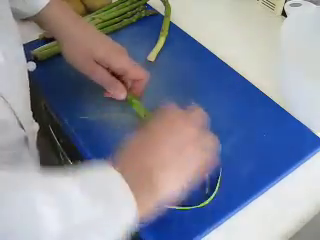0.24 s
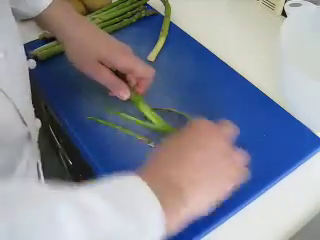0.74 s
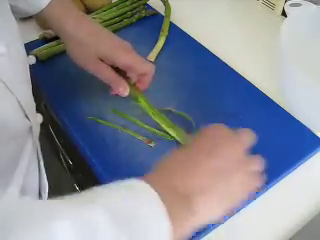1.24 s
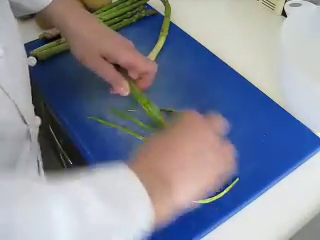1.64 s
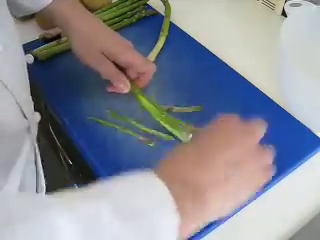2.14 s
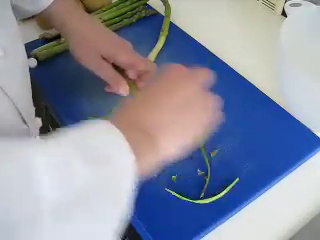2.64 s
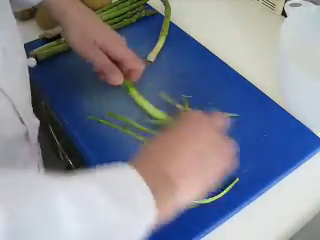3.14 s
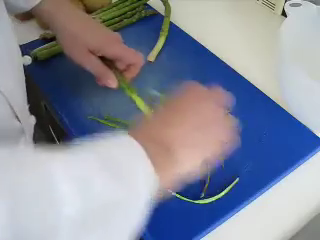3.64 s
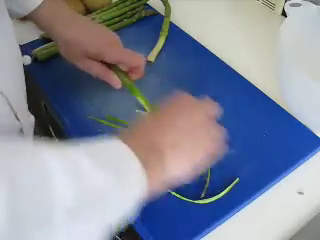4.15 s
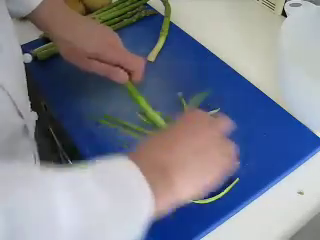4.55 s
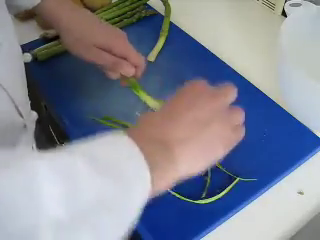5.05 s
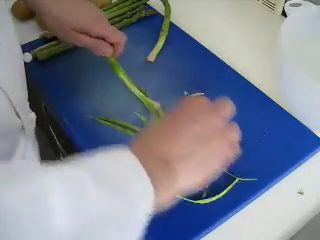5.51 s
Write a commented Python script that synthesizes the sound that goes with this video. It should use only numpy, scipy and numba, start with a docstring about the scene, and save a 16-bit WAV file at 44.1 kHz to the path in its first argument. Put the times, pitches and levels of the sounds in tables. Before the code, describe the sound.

Over a steady rush and faint hum of kitchen ventilation, a vegetable peeler works along an asparagus stalk in about fifteen quick strokes. Each is a sharp metallic clack, a short juicy scrape with tiny snaps, then a lighter tick. The peeling is close and fairly dry. Occasional soft knocks and a utensil, jangling faintly midway and ringing near the end, sound more distant and roomy.

```python
"""A reverberant kitchen, the microphone close to a plastic board where asparagus is being peeled.
At each stroke the loose steel blade clacks onto the stalk, rasps through the fibres and ticks as the
strip comes free. Further off are dull knocks and a ringing utensil, with ventilation behind it all.
A limiter after the microphone ducks everything briefly on the loud clacks."""
import sys
import numpy as np
from scipy import signal
from scipy.fft import rfft, irfft
from scipy.io import wavfile
from scipy.ndimage import uniform_filter1d, minimum_filter1d
from numba import njit

SR = 44100
rng = np.random.default_rng(int(sys.argv[2]) if len(sys.argv) > 2 else 0)


def waveform_to_disk(signal):
    """Save audio, clipped to [-1, 1], as 16-bit WAV at the path in sys.argv[1]."""
    frames = np.transpose(np.atleast_2d(signal))
    scaled = np.clip(frames, -1, 1) * 32767
    samples = np.round(scaled).astype(np.int16)
    wavfile.write(sys.argv[1], SR, samples)


N = 254871
T = np.arange(N) / SR

# Rush of the ventilation. Each row: frequency in Hz, relative level in dB.
AIR_SPECTRUM = [(15, -31), (25, -5), (144, -4), (215, -9), (297, -4), (666, -4), (782, -4), (1020, -3),
                (1450, -6), (2850, -12.5), (3090, -9.5), (6210, -15), (7910, -21), (9300, -18.5),
                (15500, -21.5)]
# Its low hum. Each row: frequency in Hz, typical rms level in dB.
HUM_TONES = [(62, -64), (100, -66)]
# Swells of a higher hum. Each row: centre in seconds, rms level in dB.
HUM_SWELLS = [(.06, -53), (.8, -57), (1.65, -53)]
# Dull knocks, further off. Each row: start in seconds, relative level in dB.
KNOCKS = [(0.002, -40.5), (1.049, -34.5), (1.896, -35), (4.359, -41), (5.193, -38.5)]
# Resonances of a knock. Each row: frequency in Hz, width in Hz, gain in dB.
KNOCK_MODES = [(342, 31, -2), (473, 110, -1), (634, 15, 8), (628, 93, -1), (805, 110, -41)]
# A metal utensil, further off. Each row: start in seconds, then ring, scrape and jangle in relative dB.
CLATTERS = [(0.002, -54, -49, -29.5), (2.942, -51, -29, -37), (2.985, -50, -37, -28.5),
            (3.021, -49, -31, -26.5), (5.400, -16.5, -28.5, -23), (5.428, -31, -27.5, -42),
            (5.457, -42, -37, -37), (5.488, -29.5, -46, -40)]
# Its resonances. Each row: frequency in Hz, width in Hz, gain in dB.
UTENSIL_MODES = [(870, 44, -17), (940, 18, 5.5), (962, 22, 13), (1007, 20, 8.5), (1040, 9.8, -6),
                 (1120, 25, -12), (1776, 64, 3.5), (1920, 35, -6), (1940, 60, -5), (2820, 88, -9),
                 (3520, 80, -22)]
# Its hollow scrape and its bright jangle. Each row: frequency in Hz, relative level in dB.
SCRAPE_SPECTRUM = [(100, -75), (400, -23), (700, 9.5), (900, 8.5), (1250, 5.5), (1480, -12), (1850, 9),
                   (2400, -35), (3500, -8), (8000, -37)]
JANGLE_SPECTRUM = [(600, -7.5), (3000, -6), (4300, -6.5), (5300, 0.5), (6200, 2), (7200, -10),
                   (10000, -10.5), (11400, -6.5), (12400, -0.5), (14000, -11), (16000, -12)]
# The blade lands, close by. Each row: start in seconds, relative level in dB, ping in Hz, then
# brightness, freedom to ring and low thump in relative dB.
CLACKS = [(0.2049, -23, 5170, 1.5, 4.5, -68), (0.6754, -19, 5340, -1, 1.5, -44),
          (1.074, -20, 4320, 3, 0, -54), (1.5905, -23, 5110, -0.5, 1, -63), (2.4055, -20, 5470, 0, 0, -54),
          (2.779, -18, 5260, 2, 3.5, -62), (3.4628, -39, 5930, 2, 6.5, -80), (3.79, -28, 5330, 1, 5, -54.5),
          (4.114, -17.5, 5320, 0.5, 1, -35), (4.4671, -22.5, 5340, 2, 2, -75),
          (4.8469, -18.5, 6200, -0.5, 1, -39), (5.2652, -19, 5640, 1.5, -3, -43),
          (5.3936, -28, 5970, 1.5, 0, -54), (5.758, -35, 5520, 1.5, 0, -60)]
# Resonances of the peeler. Each row: frequency in Hz, width in Hz, gain in dB.
PEELER_MODES = [(1492, 122, -5), (2630, 170, -11.5), (3540, 560, -10), (4340, 250, -15), (5353, 104, 8.5),
                (5910, 290, 2.5), (6150, 170, -14.5), (8670, 190, -7.5), (10410, 960, -13),
                (11225, 230, -2), (12000, 300, 0), (13800, 310, -9.5), (14100, 190, -59)]
# Edges in Hz of the four bands of a blade hit: thud, frame, blade ring, sizzle.
BAND_EDGES_HZ = [170, 900, 4200, 8000, 17000]
# Balance of those bands in dB, for a clack and for a tick.
CLACK_BALANCE_DB = [-15, -4.5, 1.5, 3.5]
TICK_BALANCE_DB = [-20, -3, 2.5, 0.5]
# What each band gains, in dB per dB of brightness.
BRIGHTNESS_SLOPE = [-0.29, -0.71, 0.082, 0.48]
# The edge bites, cuts deeper and eases off. Each row: start, swell and ease in seconds, then
# stalk body, fibre rasp and wet hiss in relative dB.
STROKES = [(0.272, 0.095, 0.099, -40, -32, -44), (0.728, 0.085, 0.055, -44.5, -28, -42),
           (1.215, 0.049, 0.095, -41.5, -31, -41), (1.654, 0.063, 0.066, -41, -30.5, -42),
           (2.003, 0.011, 0.035, -40.5, -45.5, -48.5), (2.06, 0.078, 0.033, -40, -27.5, -38.5),
           (2.451, 0.033, 0.08, -35.5, -23.5, -36.5), (2.83, 0.064, 0.027, -44, -30.5, -47),
           (3.185, 0.05, 0.045, -37, -29.5, -43), (3.486, 0.014, 0.082, -44, -29.5, -40),
           (3.825, 0.12, 0.02, -46, -37, -49), (4.195, 0.042, 0.066, -49, -32.5, -42.5),
           (4.523, 0.069, 0.082, -39.5, -32.5, -40), (4.915, 0.057, 0.059, -36, -30.5, -41),
           (5.305, 0.074, 0.085, -40.5, -35, -48)]
# Resonances of the stalk on the board and of the edge. Each row: frequency in Hz, width in Hz, gain in dB.
STALK_MODES = [(377, 21, -5), (657, 75, 10), (1060, 1700, -4.5), (1316, 250, 5.5)]
EDGE_MODES = [(2470, 250, 4), (3226, 230, 8), (3457, 580, 11.5), (3806, 61, 12.5), (4340, 150, -13.5)]
# Spray of breaking cells. Each row: frequency in Hz, relative level in dB.
SPRAY_SPECTRUM = [(1500, -21.5), (4000, -4), (5350, 8), (6100, 9), (6900, -8.5), (7500, 9), (8400, -2.5),
                  (10000, 4.5), (11800, -1.5), (13000, 2), (13800, -1), (15800, 0.5)]
# Tough fibres snap under the edge. Each row: start in seconds, relative level in dB.
SNAPS = [(0.355, -29), (0.3597, -22.5), (0.365, -31), (0.7324, -24.5), (0.7933, -34), (0.8082, -29),
         (1.311, -27), (1.706, -31), (2.053, -40), (2.5607, -30.5), (3.1947, -29), (3.911, -35),
         (3.9503, -30.5), (5.329, -28.5)]
# The freed blade meets its stop. Each row: start in seconds, relative level in dB, ping in Hz, then
# brightness and freedom to ring in dB.
TICKS = [(0.4534, -32.5, 6050, -2, 5), (0.4905, -42, 5700, -5, 6), (0.9284, -34.5, 5970, -4, 2),
         (0.9438, -26, 5600, 3.5, 3), (1.1415, -19.5, 5780, 2, 3), (1.1464, -20, 5200, 13, -17),
         (1.3372, -23, 5570, -2.5, 3.5), (1.8344, -25.5, 5650, 0.5, 6.5), (1.992, -21.5, 4810, 1, 2),
         (2.0161, -28, 5170, -7, 6), (2.0368, -28.5, 5230, -8, -4), (2.1702, -18.5, 5170, -1, -2.5),
         (2.1861, -13.5, 6140, 2.5, 3.5), (2.3518, -36.5, 5250, -7, 9.5), (2.5925, -23.5, 6260, 0.5, 4),
         (2.621, -25.5, 4420, -1.5, 4), (2.9119, -29.5, 5900, 0, 7.5), (2.9164, -22.5, 3300, -4, -4),
         (2.925, -22, 3400, 18, -7), (2.9416, -23.5, 5260, -8, 4.5), (3.1324, -27.5, 5740, 8, 5),
         (3.1408, -25, 5450, 0, 2), (3.2415, -26.5, 5150, 7, 3.5), (3.2683, -23, 4390, 5, -1.5),
         (3.5683, -22.5, 5230, 4, -2), (3.5826, -18, 6070, 1, 5), (3.965, -39, 5890, 18, 2),
         (4.3214, -21, 6030, -2, 3), (4.6953, -32, 5960, -2, 4.5), (5.0851, -21, 5780, 0.5, 3),
         (5.2043, -35, 4300, -1, -4), (5.22, -31.5, 4450, 11, 2.5), (5.2255, -27.5, 4900, 6, -0.5),
         (5.4012, -16, 3080, -6, -1)]


def undb(db):
    """Decibels to gain."""
    return 10 ** (np.asarray(db) / 20)


def unit(x):
    """Scale to rms 1."""
    return x / np.sqrt(np.mean(x ** 2) + 1e-20)


def add_hit(out, start_s, hit, db):
    """Mix in a hit, scaled so that its energy spread over 10 ms has the level db."""
    hit = hit * undb(db) / np.sqrt(np.sum(hit ** 2) / (SR / 100))
    i = max(int(start_s * SR), 0)
    out[i:i + len(hit)] += hit[:max(N - i, 0)]


def ring(x, modes):
    """Pass x through parallel resonances."""
    return sum(undb(db) * signal.lfilter(*signal.iirpeak(hz, hz / width, SR), x) for hz, width, db in modes)


def colour(x, points):
    """Give x a smooth spectrum of (Hz, dB) points, at rms 1."""
    hz, db = np.transpose(points)
    freqs = np.maximum(np.fft.rfftfreq(len(x), 1 / SR), 1)
    gain = undb(np.interp(np.log(freqs), np.log(hz), db))
    return unit(irfft(rfft(x) * gain, len(x)))


def walk(rate_hz):
    """Smooth random drift with a spread near 1."""
    knots = rng.standard_normal(4096)
    return 1.22 * np.interp(T * rate_hz, np.arange(len(knots)), knots)


def burst(hold_s, decay_s, rise_s=0.00083, size=4096):
    """A contact: a short chatter of tiny impacts that builds and dies away."""
    t = T[:size]
    envelope = (1 - np.exp(-t / rise_s)) * np.exp(-np.maximum(t - hold_s, 0) / decay_s)
    return rng.standard_normal(size) * envelope


def ventilation(air_db=-47, upper_hum_hz=206.3, rest_db=-64, swell_s=0.11):
    """Room tone: steady rushing air and a faint wavering hum whose top note swells now and then."""
    air = colour(rng.standard_normal(N), AIR_SPECTRUM) * undb(air_db + .5 * walk(4.9))
    swells = sum(undb(db) * np.exp(-((T - s) / swell_s) ** 2) for s, db in HUM_SWELLS)
    tones = [(hz, undb(db)) for hz, db in HUM_TONES] + [(upper_hum_hz, undb(rest_db) + swells)]
    hum = sum(gain * undb(walk(6)) * unit(np.sin(2 * np.pi * hz * T + walk(20))) for hz, gain in tones)
    return air + hum


def knocks(gain_db=-1.5, bounce_s=0.00526, bounce_db=4.0, contact_s=0.00027):
    """Soft double blows on a plastic board, the second the stronger."""
    out = np.zeros(N)
    contact = np.exp(-T[:4096] / contact_s)
    thud = ring(ring(contact, KNOCK_MODES), [(596, 750, 0)])
    for s, db in KNOCKS:
        add_hit(out, s, thud, db + gain_db)
        add_hit(out, s + bounce_s, thud, db + gain_db + bounce_db)
    return out


def utensil_clatter(gain_db=-5.0, scrape_s=0.012, jangle_s=0.02):
    """A utensil slides, strikes and settles: a ring, a hollow scrape and a bright jangle."""
    out, t = np.zeros(N), T[:8192]
    ringing = ring(signal.unit_impulse(len(t)), UTENSIL_MODES)
    for s, ring_db, scrape_db, jangle_db in CLATTERS:
        scrape = colour(rng.standard_normal(len(t)), SCRAPE_SPECTRUM) * np.exp(-t / scrape_s)
        jangle = colour(rng.standard_normal(len(t)), JANGLE_SPECTRUM) * np.exp(-t / jangle_s)
        for part, db in [(ringing, ring_db), (scrape, scrape_db), (jangle, jangle_db)]:
            add_hit(out, s, part, db + gain_db)
    return out


def blade_hits(hits, balance_db, gain_db, hold_s, decay_s, crack_db, rattle_db, ping_db, ping_width_hz,
               rattle_s=.005, scatter_db=2.):
    """The blade chatters in its pivots and rings the peeler; the looser it is, the more it rings."""
    out = np.zeros(N)
    bands = [signal.butter(3, edges, "band", fs=SR, output="sos")
             for edges in zip(BAND_EDGES_HZ, BAND_EDGES_HZ[1:])]
    for s, db, ping_hz, bright_db, ring_db, *_ in hits:
        # the loose blade sits differently each time, which reweights its modes
        modes = [(hz, width, mode_db + scatter_db * rng.standard_normal())
                 for hz, width, mode_db in PEELER_MODES]
        modes.append((ping_hz, ping_width_hz, ping_db + ring_db))
        contact = burst(hold_s, decay_s)
        rattle = undb(rattle_db) * burst(0, rattle_s)
        hit = ring(contact + rattle, modes) + undb(crack_db) * contact
        tilt_db = bright_db * np.array(BRIGHTNESS_SLOPE)  # a sharper contact is brighter
        thud, frame, blade, sizzle = gain_db + db + np.array(balance_db) + tilt_db
        for band, band_db in zip(bands, [thud, frame, blade + ring_db, sizzle]):
            add_hit(out, s, signal.sosfilt(band, hit), band_db)
    return out


def blade_clacks():
    """The loose blade lands on the stalk and rattles hard."""
    return blade_hits(CLACKS, CLACK_BALANCE_DB, gain_db=11.5, hold_s=0.0026, decay_s=0.0006,
                      crack_db=-9.0, rattle_db=2.0, ping_db=4.0, ping_width_hz=70)


def clack_thumps(gain_db=16.5, pulse_s=0.00089):
    """A short low thump with each clack, as the microphone overloads."""
    out = np.zeros(N)
    pulse = np.exp(-((T[:512] - 2 * pulse_s) / pulse_s) ** 2)
    for s, *_, db in CLACKS:
        add_hit(out, s, pulse, db + gain_db)
    return out


def stroke_shape(s, swell_s, ease_s, swell_db, ease_db, lead_s, fade_s, roundness=1.37):
    """Gain over a stroke: up by swell_db to the deepest cut, down by ease_db as the strip thins."""
    start, deepest, end = s - lead_s, s + swell_s, s + swell_s + ease_s
    touch = np.clip(1 + np.minimum(T - start, end - T) / fade_s, 0, 1)
    before = np.interp(T, [start, deepest], [1, 0])
    after = np.interp(T, [deepest, end], [0, 1])
    return touch * undb(-swell_db * before ** roundness - ease_db * after ** roundness)


def tiny_snaps(per_s, spread_db, grip_db):
    """Cells and fibres break in snaps of uneven size, in bunches as the edge grips and slips."""
    snaps = (rng.random(N) < per_s / SR) * rng.standard_normal(N)
    size_db = spread_db * np.minimum(rng.exponential(size=N), 4)
    return snaps * undb(size_db + grip_db)


def peeling_strokes(body_db=-0.5, hiss_db=7.0, crackle_db=-15):
    """Each stroke tears a strip: the snaps ring the stalk and the edge, and spray a wet hiss."""
    body, rasp, hiss = np.zeros((3, N))
    for *timing, stalk_db, edge_db, wet_db in STROKES:
        body += undb(stalk_db) * stroke_shape(*timing, 7, 10.5, lead_s=-.004, fade_s=0.013)
        rasp += undb(edge_db) * stroke_shape(*timing, 13, 20, lead_s=0.0011, fade_s=0.023)
        hiss += undb(wet_db) * stroke_shape(*timing, 1.5, 4, lead_s=0.023, fade_s=0.0069)
    grip = 0.8 * walk(330) + 0.47 * walk(64)
    tearing = tiny_snaps(per_s=6000, spread_db=1.5, grip_db=3.2 * grip)
    spray = tiny_snaps(per_s=9000, spread_db=2.0, grip_db=2.6 * grip)
    crackle = tiny_snaps(per_s=260, spread_db=1.1, grip_db=grip)
    crunch = tiny_snaps(per_s=5000, spread_db=0.95, grip_db=grip)
    return (rasp * undb(crackle_db) * unit(crackle + ring(crackle, EDGE_MODES))
            + body * undb(body_db) * unit(ring(crunch, STALK_MODES))
            + rasp * unit(ring(ring(tearing, EDGE_MODES), [(3190, 2300, 0)]))
            + hiss * undb(hiss_db) * colour(spray, SPRAY_SPECTRUM))


def fibre_snaps(gain_db=-2.0):
    """A tough fibre gives way with a crack that rings the cutting edge."""
    out = np.zeros(N)
    for s, db in SNAPS:
        crack = burst(hold_s=0.00042, decay_s=0.0023)
        add_hit(out, s, ring(crack, EDGE_MODES) + crack, db + gain_db)
    return out


def blade_ticks():
    """The freed blade swivels lightly against its stop."""
    return blade_hits(TICKS, TICK_BALANCE_DB, gain_db=-5.0, hold_s=0.00041, decay_s=0.0011,
                      crack_db=-10.0, rattle_db=-7.0, ping_db=6.0, ping_width_hz=85)


def kitchen(x, wet_db, t60_s=0.51, treble_t60_s=0.42, build_s=0.0009):
    """Direct sound plus the diffuse tail off hard walls; the treble dies a little sooner."""
    t = T[:SR]
    noise = rng.standard_normal(SR)
    low = signal.sosfilt(signal.butter(1, 4000, fs=SR, output="sos"), noise)
    tail = low * undb(-60 * t / t60_s) + (noise - low) * undb(-60 * t / treble_t60_s)
    tail *= 1 - np.exp(-t / build_s)
    return x + undb(wet_db) * signal.fftconvolve(x, tail / np.linalg.norm(tail))[:N]


def scene():
    """One microphone position: the peeling close and fairly dry, knocks and clatter far and roomy."""
    clacks, ticks = blade_clacks(), blade_ticks()
    peeling = peeling_strokes() + fibre_snaps()
    near = kitchen(clacks, wet_db=-12.5) + kitchen(ticks, wet_db=-8.5) + kitchen(peeling, wet_db=-11.0)
    far = kitchen(knocks(), wet_db=-1.0) + kitchen(utensil_clatter(), wet_db=3.0)
    return (near + clack_thumps() + far + ventilation())[None]


@njit
def peak_level(x, attack, release):
    """Follow the peaks of x, rising fast and falling slowly."""
    out, level = np.empty(len(x)), 0.
    for i in range(len(x)):
        size = abs(x[i])
        level += (size - level) * (attack if size > level else release)
        out[i] = level
    return out


def record(dry, ceiling=0.49, release_s=0.048, notch_hz=7900, notch_width_hz=750, top_hz=15750):
    """The microphone port has a narrow dip; a fast limiter holds the clacks down and lets go slowly."""
    mic = signal.lfilter(*signal.iirnotch(notch_hz, notch_hz / notch_width_hz, SR), dry[0])
    level = peak_level(mic, attack=0.65, release=1 / (release_s * SR))
    gain = ceiling / np.maximum(level, ceiling)
    limited = mic * uniform_filter1d(minimum_filter1d(gain, size=15), size=15)
    lowpass = signal.ellip(10, .2, 70, top_hz, fs=SR, output="sos")
    return signal.sosfilt(lowpass, limited)[None]


dry = scene()
out = record(dry)
waveform_to_disk(out)
```